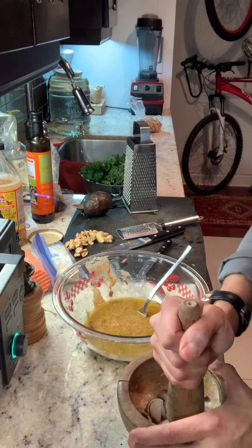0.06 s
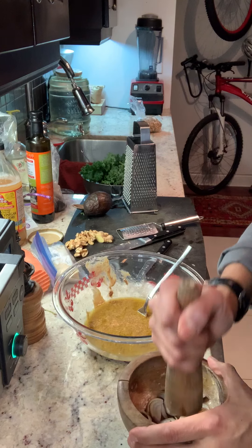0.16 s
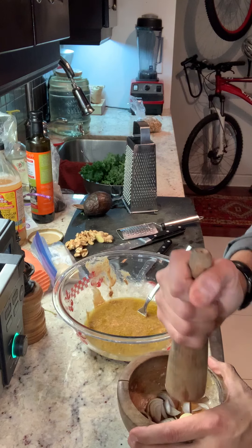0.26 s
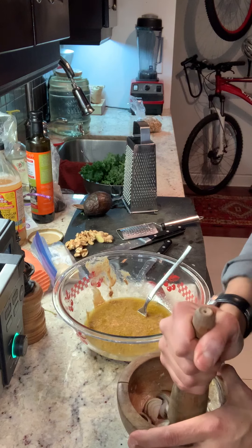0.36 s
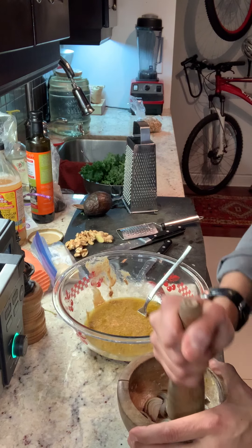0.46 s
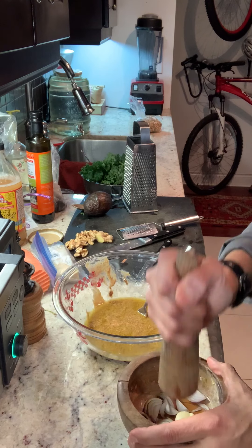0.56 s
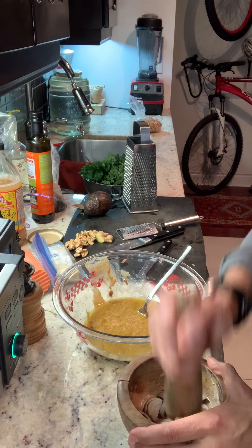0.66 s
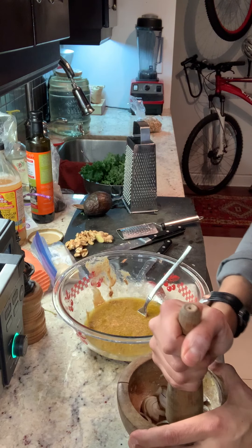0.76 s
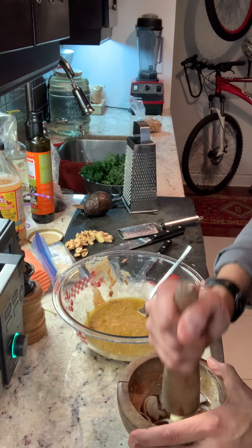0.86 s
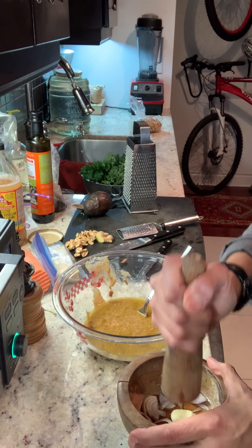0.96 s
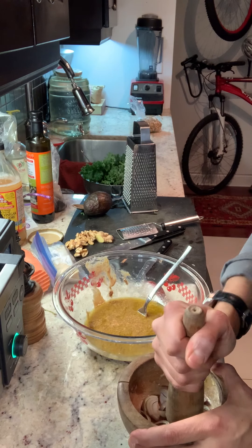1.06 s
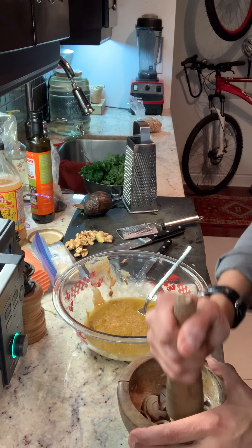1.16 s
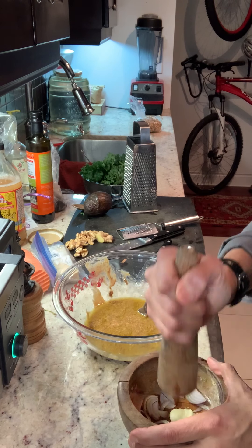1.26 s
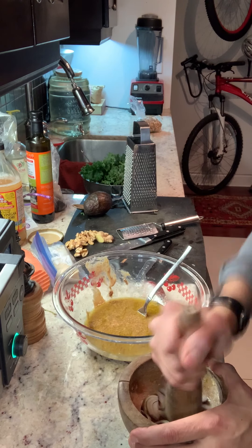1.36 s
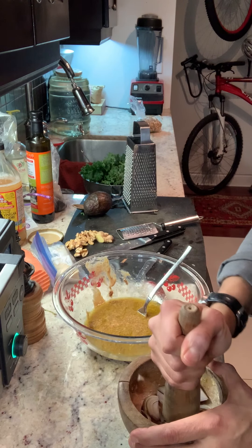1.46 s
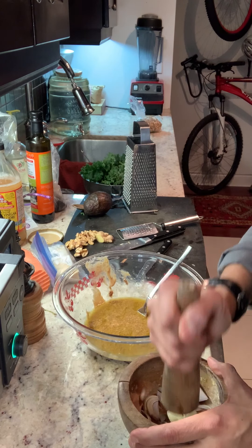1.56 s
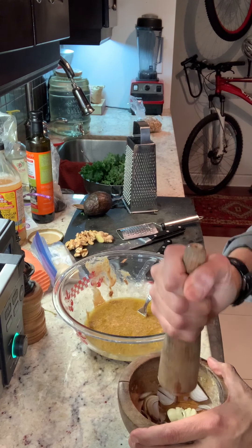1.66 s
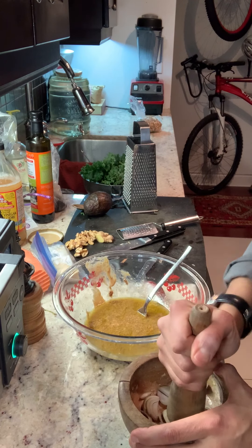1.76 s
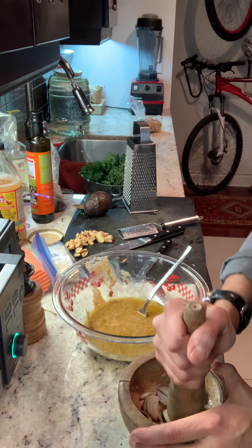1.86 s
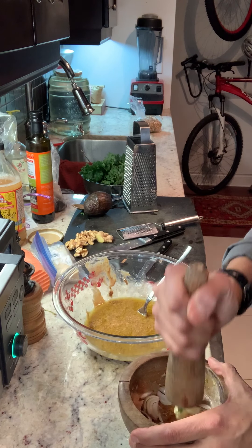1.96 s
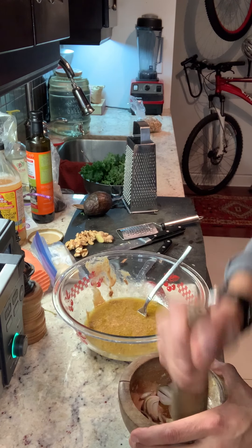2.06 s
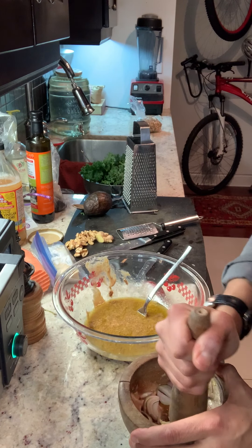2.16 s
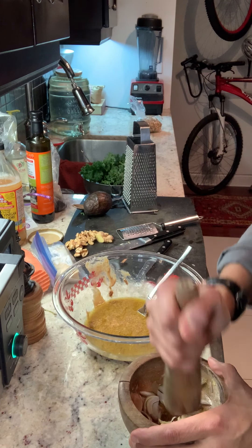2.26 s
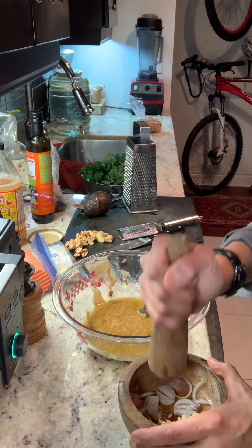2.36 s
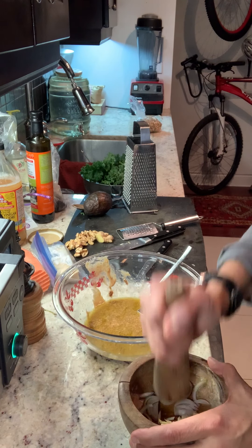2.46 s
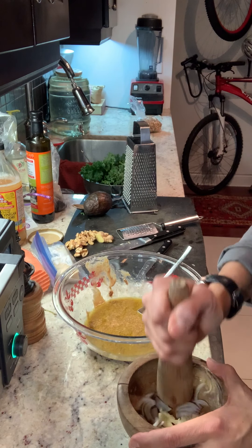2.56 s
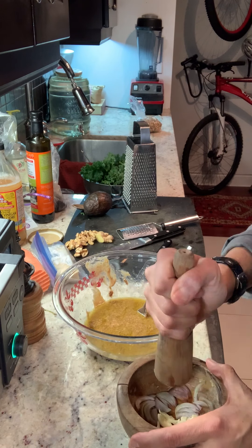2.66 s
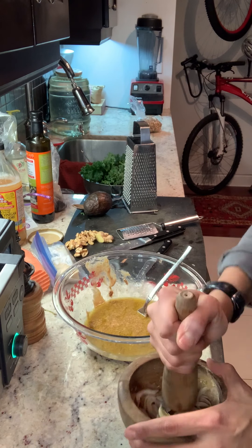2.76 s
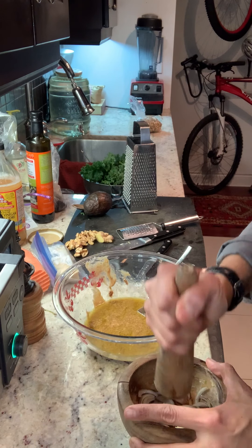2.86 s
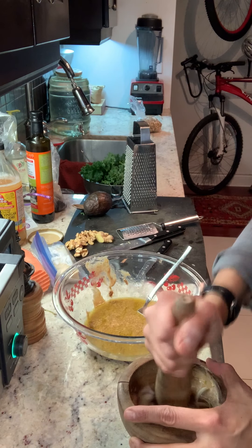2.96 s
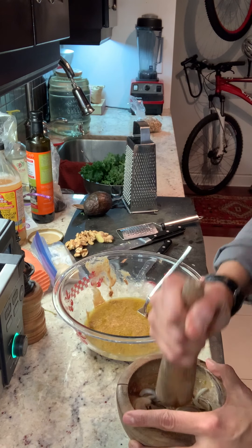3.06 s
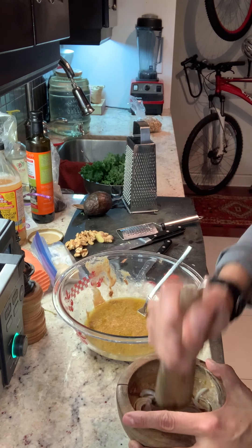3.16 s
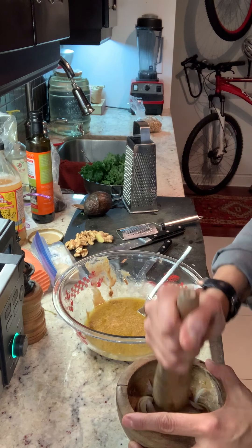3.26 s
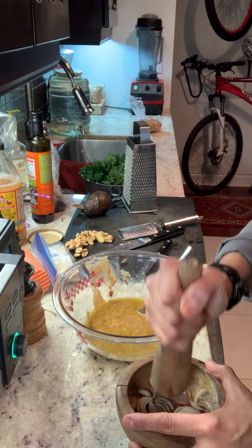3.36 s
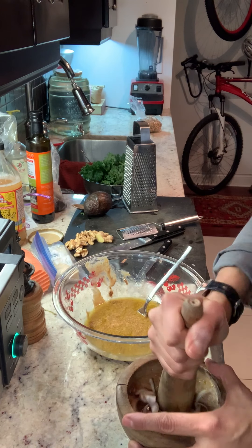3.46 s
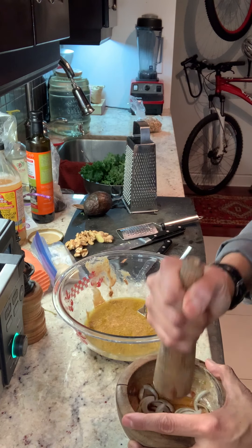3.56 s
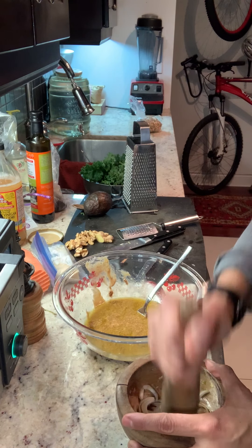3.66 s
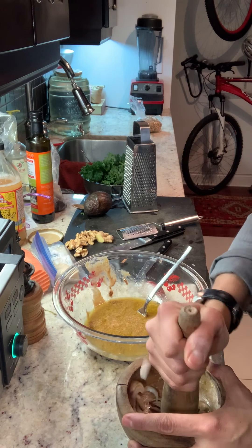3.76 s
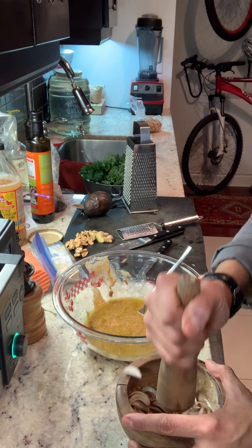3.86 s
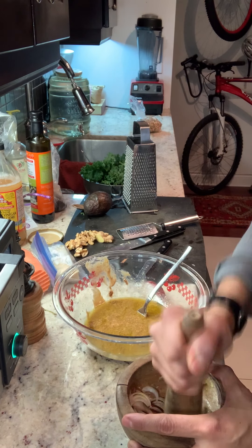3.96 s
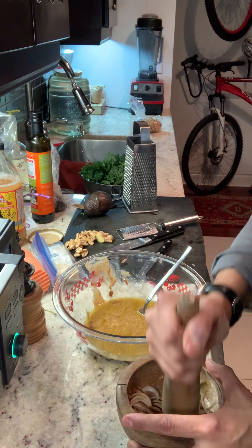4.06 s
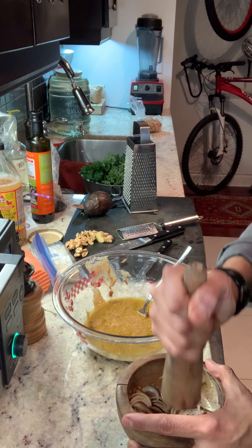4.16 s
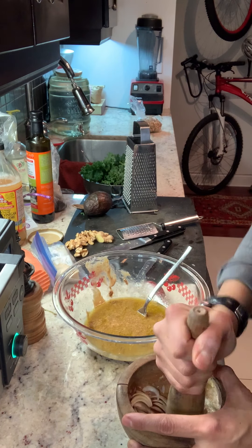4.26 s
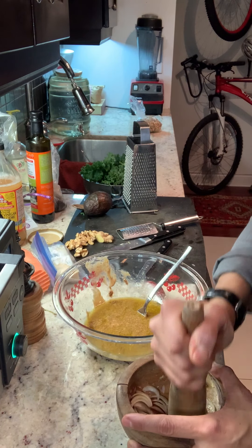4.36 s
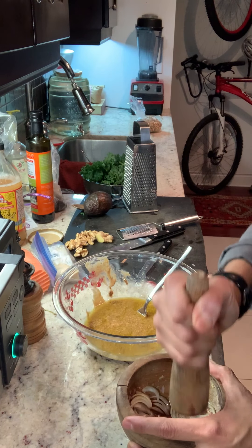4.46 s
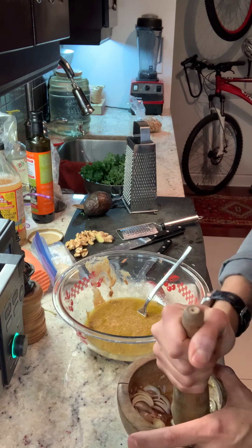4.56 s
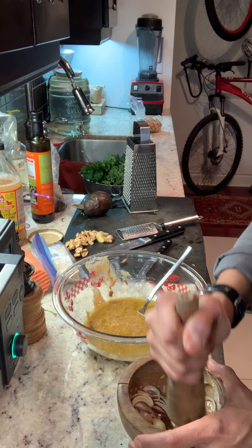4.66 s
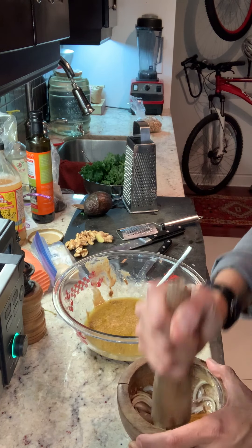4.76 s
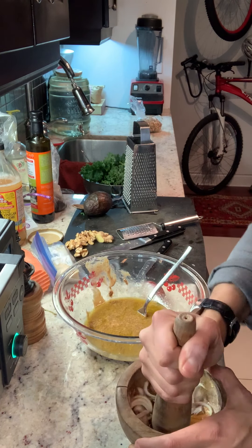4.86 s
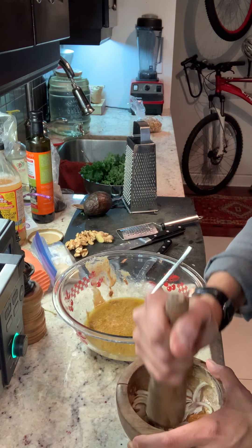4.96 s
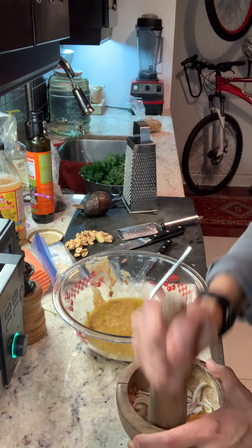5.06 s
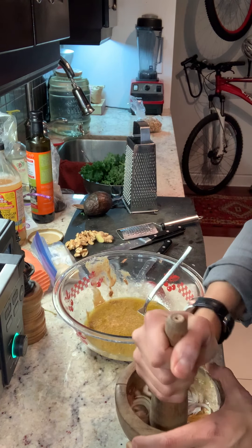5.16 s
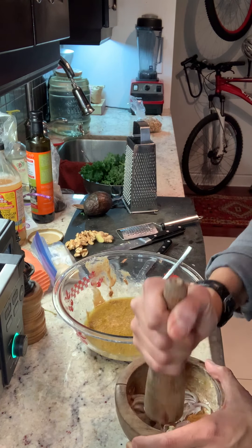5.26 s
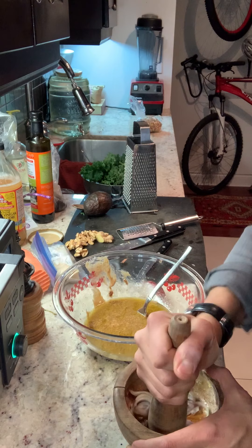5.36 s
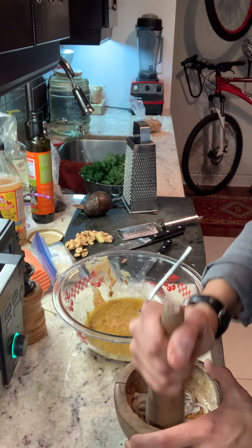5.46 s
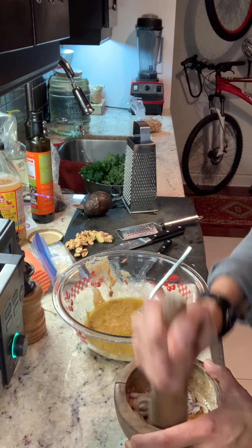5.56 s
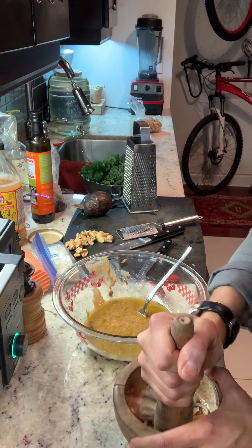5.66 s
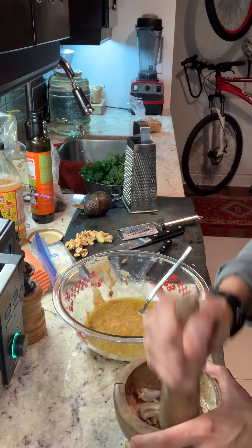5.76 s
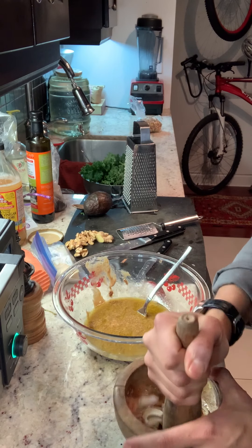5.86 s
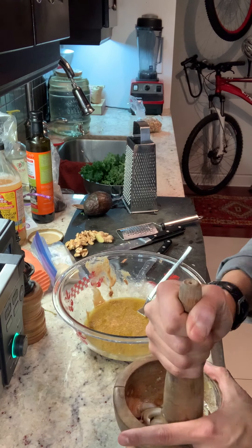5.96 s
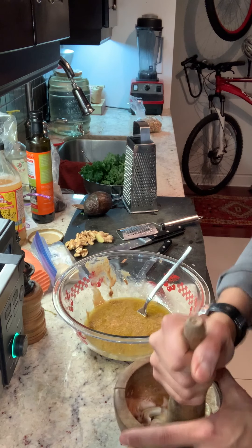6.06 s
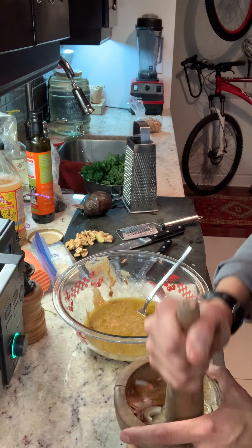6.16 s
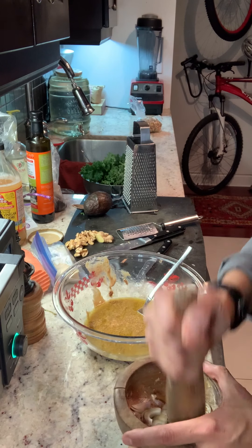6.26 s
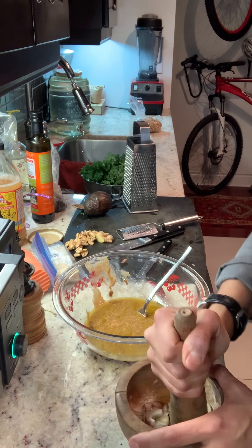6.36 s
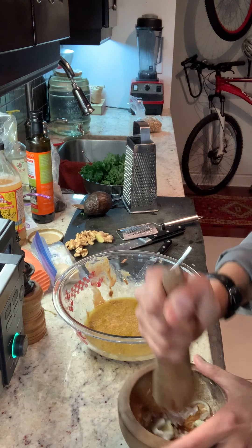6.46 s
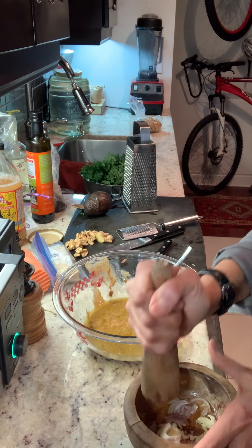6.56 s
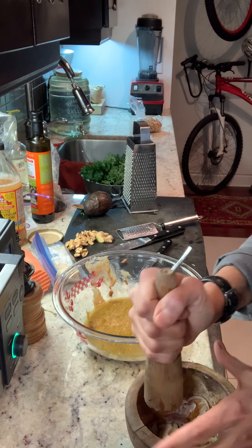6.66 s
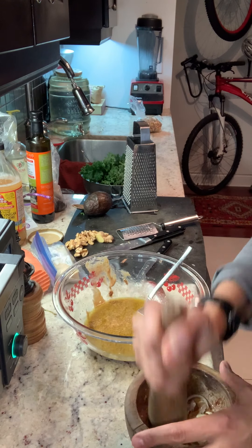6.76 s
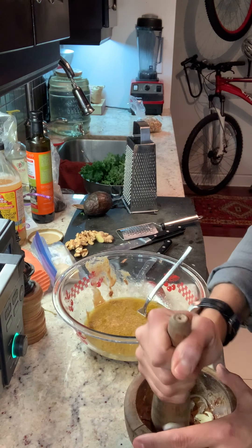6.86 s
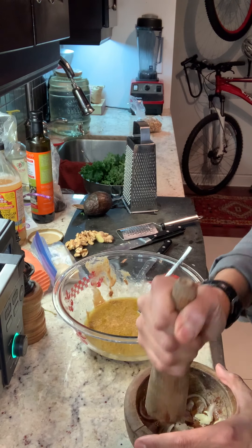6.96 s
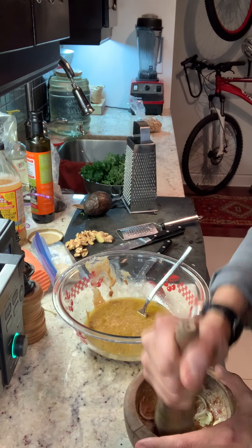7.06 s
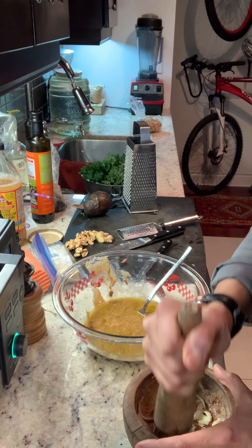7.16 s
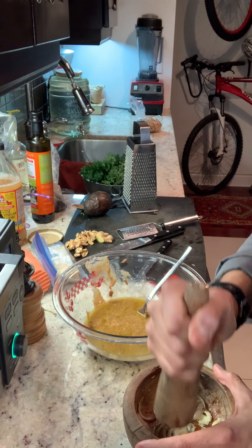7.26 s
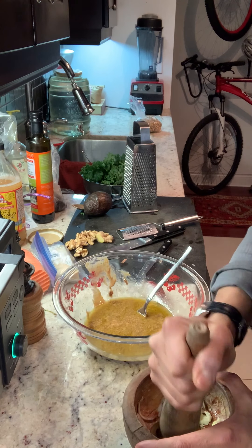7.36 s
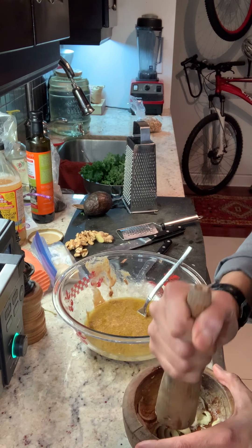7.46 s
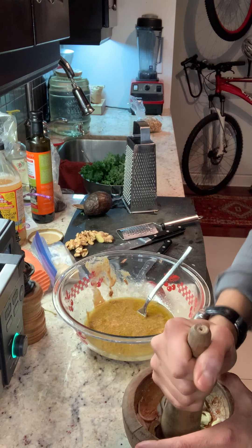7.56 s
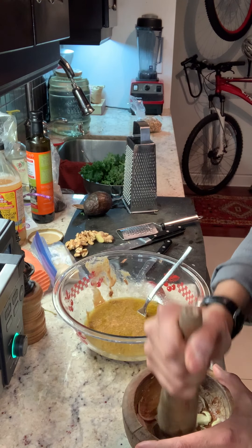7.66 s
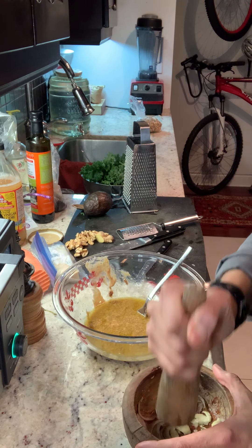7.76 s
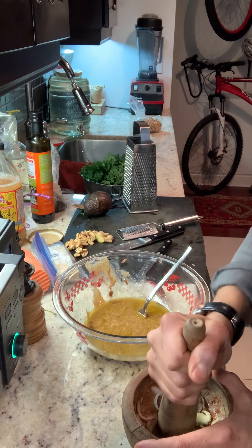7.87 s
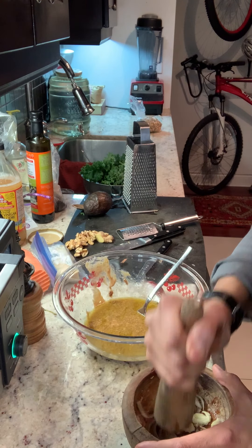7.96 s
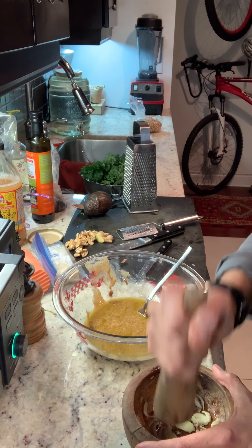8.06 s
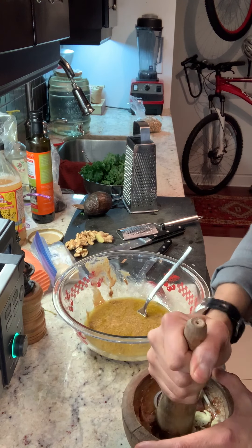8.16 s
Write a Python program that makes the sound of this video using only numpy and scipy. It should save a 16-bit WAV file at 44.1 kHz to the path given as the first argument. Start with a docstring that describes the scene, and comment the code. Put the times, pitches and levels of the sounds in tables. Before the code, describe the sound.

A wooden pestle pounds garlic and shallot in a wooden mortar, steady woody knocks with juicy crunches and low counter thumps in a quiet kitchen.

```python
"""A quiet kitchen hush, then at once a woody blow: garlic and shallot pounded in a hand-held wooden mortar.
In each blow noisy bursts of juicy flesh and the pestle's short tock come first, then the knock on wood,
made of decaying modes and rough grain: dull on a thick layer, hard on a thin one. The counter thumps under
the mortar, low standing waves boom and dishes nearby ring faintly. A microphone pair hears the direct
sound and the dense echoes of the kitchen, the right port louder."""
import sys
import numpy as np
from scipy import signal
from scipy.fft import rfft, irfft, next_fast_len
from scipy.io import wavfile

SR = 44100
rng = np.random.default_rng(int(sys.argv[2]) if len(sys.argv) > 2 else 0)


def master(y):
    """Save y as 16-bit WAV."""
    cut = np.clip(np.atleast_2d(y).T, -1, 1)
    pcm = np.round(cut * 32767)  # scale
    wavfile.write(sys.argv[1], SR, pcm.astype(np.int16))


N = 362502

# Blows of the pestle, levels before the trims in blow() and pounding():
# start_s (tip lands), contact, push_db (on the counter), knock_db (on the wood), crunch_db,
# squeeze_s (before the wood is met)
BLOWS = [(0.03, "woody", -20.5, -32.5, -36.5, .0033), (0.3772, "woody", -20.5, -32.5, -34, 0.00232),
         (0.7264, "woody", -18, -30.5, -32, 0.0049), (1.0655, "firm", -17, -26.5, -30.5, 0.002),
         (1.4122, "firm", -17, -23.5, -26, 0.003), (1.7782, "woody", -16.5, -27.5, -27.5, .0037),
         (2.1206, "woody", -20.5, -39, -31.5, 0.001095), (2.528, "ringing", -23, -21.5, -36, .009),
         (2.7895, "hard", -37, -19.5, -37, 0.002), (3.0148, "padded", -22, -36, -34, 0.0029),
         (3.2352, "firm", -21, -30, -31, .0029), (3.4633, "ringing", -21, -17.5, -31.5, .0065),
         (3.729, "padded", -24, -47.5, -32, 0.00058), (4.0176, "padded", -21.5, -40, -35, .0019),
         (4.299, "firm", -17.5, -24, -28.5, .0034), (4.564, "hollow", -18.5, -25, -27, .0024),
         (4.8523, "hard", -23, -21, -38, .0051), (5.1351, "hard", -21.5, -20.5, -35.5, .0054),
         (5.389, "hard", -21.5, -22, -35, .0061), (5.6382, "hard", -23.5, -19.5, -36, .0042),
         (5.8744, "hard", -25, -21.5, -37, 0.0062), (6.1097, "firm", -24, -26, -34, .0082),
         (6.3456, "hollow", -19.5, -23, -32.5, 0.0026), (6.6217, "glancing", -35, -27.5, -57.5, 0.0016),
         (6.8318, "glancing", -28.5, -46.5, -34.5, 0.00287), (7.1226, "glancing", -30.5, -45, -38, 0.00397),
         (7.3755, "firm", -24, -44, -38, 0.00105), (7.6328, "padded", -20, -32.5, -35.5, .0025),
         (7.8928, "padded", -21.5, -36, -34.5, .0024), (8.1502, "firm", -19.5, -26, -35.5, .0035)]
# Bits of flesh that snap or fall back: start_s, level_db (before the trim in pounding())
BITS = [(2.609, -38), (2.793, -29), (3.541, -29), (3.5527, -38), (6.2866, -52), (6.839, -24.5),
        (7.034, -46.5)]
# Ways the pestle meets the wood: spot_hz, spot_db (weight of that tone), body_db (hollow low wood),
# high_db and clack_db (against the knock), tock_db (pestle against the crunch, before its trim)
CONTACTS = {"padded": (961, 13.5, 0, -15.5, -12, -19.5), "firm": (990.5, -6.5, .5, -9, -12, -7),
            "woody": (1832, -1.5, -.5, -5, -9, 1.5), "ringing": (1198.5, 8, -7, -10.5, -20.5, -4),
            "hard": (1013, 3.5, -2.5, -5, -7.5, 1), "hollow": (508.5, 9, 3.5, -9.5, -14.5, -4.5),
            "glancing": (2067, 16, -1, -4.5, -17.5, -4)}

# Bursting flesh, spectrum shape: frequency_hz, density_db (per Hz)
FLESH_SPECTRUM = [(1000, -14), (1850, -2), (2600, -8), (3700, 4), (4800, 2), (6200, 0), (9000, -1.5),
                  (12000, -4), (16000, -8)]
# The pestle's own short ring: pitch_hz, level_db (relative), t60_s
PESTLE_MODES = [(1856, -2, .024), (2028, -5, .018), (3740, -2, 0.018)]
# Counter and cabinet under the mortar: pitch_hz, level_db (relative), swell_s (time to peak)
COUNTER_MODES = [(87.2, -5, 0.018), (136.8, 0, 0.017), (191, -7, 0.024), (241.6, -10.5, 0.018)]
# Low standing waves of the kitchen, before the trims in thump(): pitch_hz, level_db, t60_s
ROOM_BOOMS = [(50.2, -1.5, 0.72), (64.2, -18.5, 2.8), (90, -18, 1.2), (94.8, -9.5, 0.91), (112, -8, 0.83),
              (123.3, -15.5, 0.8), (134.77, -9, 1.1), (141.5, -7, 0.72), (162.8, -11, 0.91),
              (192.2, -15.5, 0.95), (206, -7, 1.18), (217.9, -11.5, 0.76), (229.5, -28, 0.59),
              (238.5, -9, 0.69), (247, -17.5, 0.55), (248, -17, 0.47), (263.5, -22.5, 0.48),
              (272.4, -20.5, 1.9), (283, -14, 0.58), (357, -23, 0.3)]
# Mortar with the pestle in it, before random shifts: pitch_hz, level_db (relative), t60_s
MORTAR_MODES = [(282, -3.5, 0.066), (341.6, -1, 0.042), (391.3, -3.5, 0.049), (522, -2, 0.037),
                (546, -7, 0.032), (658, -4, 0.015), (746, -11.5, 0.032), (955, -1.5, 0.019),
                (967, 4.5, 0.025), (1010, -12.5, 0.037), (1140, -3, 0.029), (1243, -12, 0.011),
                (1340, -11.5, 0.04), (1594, 12, 0.0093), (1795, 9, 0.016), (1913, -3, 0.016),
                (2137, -1, 0.0084), (2570, -3, 0.014), (2887, -10.5, 0.012), (2770, -7.5, 0.031),
                (3094, -15, 0.076), (3800, -11, 0.015)]
# Dense, heavily damped vibration of the wood, spectrum shape: frequency_hz, density_db (per Hz)
GRAIN_SPECTRUM = [(200, -1), (600, -10.5), (1100, -4.5), (1700, 4.5), (2400, -10), (3000, -10.5),
                  (4000, -12), (6000, -13.5), (12000, -58.5)]
# Limits of the low, middle, high and clacking wood: edge_hz
REGISTER_EDGES_HZ = [230, 700, 1500, 2400, 9000]
# Low and middle wood answer later than the high wood and the clack: lag_s, one per register
REGISTER_LAGS = (0.00398, .002, 0.00023, .0001)
# Dishes on the counter, before random shifts: pitch_hz, level_db (relative), t60_s
DISH_MODES = [(1005, -7, .3), (1029, -6, .35), (1369, -6, .3), (2794, 0, .4), (2916, -1, .4)]

# Kitchen echoes: frequency_hz, reverberation_db, t60_s, left_right_likeness (0 to 1)
KITCHEN_ECHOES = [(197.6, 4, 0.49, 1), (460, 1, 0.44, 0.78), (1010, -0.5, 0.43, 0.29),
                  (1780, -7, 0.48, 0.14), (3710, -4, 0.34, 0.99), (8120, -6, 0.28, 1), (10600, -11, .27, 1),
                  (14000, -10.5, 0.19, 1)]
# Background hush, spectrum shape: frequency_hz, density_db (per Hz)
HUSH_SPECTRUM = [(30, -13.5), (55, 2.5), (130, 0.5), (200, -2.5), (260, -9.5), (500, -24.5), (1000, -23.5),
                 (2500, -38), (5000, -41), (9300, -47.5), (10500, -37), (11500, -56), (16000, -55.5)]
# Microphone pair: frequency_hz, left_minus_right_db, left_lead_radians
PORT_LEAN = [(60, -.7, 0), (130, -1.2, 0), (300, -2.9, .05), (550, -3.2, .5), (1100, -1.9, .05),
             (2200, -1, 0), (5000, -.1, 0)]

REGISTERS = list(zip(REGISTER_EDGES_HZ, REGISTER_EDGES_HZ[1:]))
REGISTER_FILTERS = [signal.butter(3, edges, "band", fs=SR, output="sos") for edges in REGISTERS]
HUSH_DB = -47                # rms ahead of the microphone pair
LEAD_S = .01                 # room left in each blow before the tip lands
CRUNCH_S = .0036             # volley of bursting cells; its pressure peaks at 0.9 of this
BODY_DB, BODY_FOLLOWS_PUSH = -3.5, 0.47   # the hollow low wood lies between knock (0) and push (1)
PORT_LAG_SAMPLES = 5         # left port behind the right, well up in the treble
CUTOFF_HZ = 16000            # top of the recorded band


def from_db(db):
    """Decibels to gain."""
    return 10 ** (np.asarray(db) / 20)


def at_hz(points, hz, axis=1):
    """Read one column of a table on a log-frequency axis."""
    points = np.array(points)
    return np.interp(np.log(hz + 1), np.log(points[:, 0]), points[:, axis])


def seconds(length):
    """A time axis."""
    return np.arange(int(length * SR)) / SR


def unit_blow(x):
    """Scale a sound to rms 1 over its first 50 ms."""
    return x / np.sqrt(np.mean(x[:SR // 20] ** 2) + 1e-20)


def add(out, start_s, x):
    """Mix a sound in at a given time."""
    i = max(int(start_s * SR), 0)
    out[..., i:i + x.shape[-1]] += x[..., :max(N - i, 0)]


def ring(hz, gain, t60, t):
    """Sum of modes, each a sine falling 60 dB in its t60."""
    decay = np.exp(-np.log(1000) * t / t60[:, None])
    return gain @ (np.sin(2 * np.pi * hz[:, None] * t) * decay)


def colour(x, spectrum):
    """Give a signal a smooth spectrum."""
    size = next_fast_len(x.shape[-1] + SR // 50)
    gain = from_db(at_hz(spectrum, np.fft.rfftfreq(size, 1 / SR)))
    return irfft(rfft(x, size) * gain, size)[..., :x.shape[-1]]


def background_hush():
    """Steady coloured noise, mostly common to both ports with a little of its own in each."""
    common = rng.standard_normal(N)
    hush = colour(common + 0.32 * rng.standard_normal((2, N)), HUSH_SPECTRUM)
    return from_db(HUSH_DB) * hush / hush.std()


def crunch(length, cells_per_s=12000, spread_db=3, squeeze_db=-19, squeeze_s=0.02, swell=3.2):
    """Cells burst in a dense volley as the pestle goes in; a few more follow as it presses on."""
    t = seconds(.08)
    struck = rng.random(len(t)) < cells_per_s / SR
    sizes = rng.standard_normal(len(t)) * from_db(spread_db * rng.standard_normal(len(t)))
    age = t / (0.9 * length)
    volley = (age * np.exp(1 - age)) ** swell
    pressing_on = from_db(squeeze_db) * np.exp(-t / squeeze_s) * np.minimum(age, 1)
    return unit_blow(colour(struck * sizes * (volley + pressing_on), FLESH_SPECTRUM))


def pestle(spread_db=1.0):
    """The pestle gives a short tock as soon as its tip lands, its modes weighted anew each time."""
    hz, db, t60 = np.transpose(PESTLE_MODES)
    gains = from_db(db + spread_db * rng.standard_normal(len(hz)))
    return unit_blow(ring(hz, gains, t60, seconds(.05)))


def thump(boom_db=-1, boom_rise_s=0.014, boom_length=0.72, swell_order=3.4):
    """The counter swells and dies within a few cycles and leaves the room's standing waves humming."""
    t = seconds(1.0)
    slab = 0
    for hz, db, swell_s in COUNTER_MODES:
        swell = (t / swell_s * np.exp(1 - t / swell_s)) ** swell_order
        slab = slab + from_db(db) * np.sin(2 * np.pi * hz * t) * swell
    hz, db, t60 = np.transpose(ROOM_BOOMS)
    gains = from_db(db + boom_db) * (-1) ** np.arange(len(hz))   # alternating polarity
    booms = ring(hz, gains, t60 * boom_length, t)
    return unit_blow(slab) + booms * (1 - np.exp(-t / boom_rise_s)) ** 2


def registers(push_db, knock_db, body_db, high_db, clack_db):
    """Levels of the low, middle, high and clacking wood: all follow the knock, the low wood also the push."""
    low_db = BODY_DB + body_db + knock_db + BODY_FOLLOWS_PUSH * (push_db - knock_db)
    return np.array([low_db, knock_db, knock_db + high_db, knock_db + clack_db])


def knock(levels_db, spot_hz, spot_db, lead_s, spread_db=2, detune=0.021, spot_t60=0.035,
          seat_s=.004, seat=0.44, contact_s=0.0019, grain=1.0, grain_s=0.0039, build_s=0.0034):
    """The pestle meets the wall, then seats on the bottom; each touch weights the wood's modes anew."""
    t = seconds(.1) - lead_s
    hz, db, t60 = np.transpose(MORTAR_MODES + [(spot_hz, spot_db, spot_t60)])
    hz = hz * (1 + detune * rng.standard_normal(len(hz)))
    gains = from_db(db + spread_db * rng.standard_normal((2, len(hz))))
    gains = gains * rng.choice([-1, 1], (2, len(hz)))
    met = np.maximum(t, 0)
    seated = np.maximum(t - seat_s * rng.uniform(0.581, 1.429), 0)
    # pulp cushions the contact, so each touch builds up
    first, second = 1 - np.exp(-met / contact_s), 1 - np.exp(-seated / contact_s)
    # the grain builds up while the pestle squeezes down, then dies away
    force = 1 / (np.exp((contact_s - t) / build_s) + np.exp((t - contact_s) / grain_s))
    dense = colour(rng.standard_normal(len(t)) * force, GRAIN_SPECTRUM)
    out = 0
    for (low, high), band, level_db, lag_s in zip(REGISTERS, REGISTER_FILTERS, levels_db, REGISTER_LAGS):
        m = (hz >= low) & (hz < high)
        wall = first * ring(hz[m], gains[0, m], t60[m], met)
        bottom = seat * second * ring(hz[m], gains[1, m], t60[m], seated)
        rough = signal.sosfilt(band, dense)
        register = unit_blow(unit_blow(wall + bottom) + grain * unit_blow(rough))
        out = out + np.interp(t - lag_s, t, from_db(level_db) * register, left=0)
    return out


def dishes(spread_db=3, damping_spread=0.13):
    """Glass and metal nearby ring as decaying modes, picking up the knock."""
    hz, db, t60 = np.transpose(DISH_MODES)
    t60 = t60 * np.exp(damping_spread * rng.standard_normal(len(hz)))
    gains = from_db(db + spread_db * rng.standard_normal(len(hz)))
    return ring(hz, gains, t60, seconds(.5))


def blow(contact, push_db, knock_db, flesh_db, squeeze_s, count,
         wood_db=(-.5, -.3, -.5, -.5), crunch_db=0.49, pestle_db=-6.0, dishes_db=-19):
    """One blow sent in several directions: tip and flesh near LEAD_S, the wood after the squeeze."""
    spot_hz, spot_db, *colour_db, tock_db = CONTACTS[contact]
    levels_db = registers(push_db, knock_db, *colour_db)
    ways = np.zeros((count, len(seconds(.55))))
    add(ways, LEAD_S, from_db(flesh_db + tock_db + pestle_db) * pestle())
    # the dishes follow the clack
    add(ways, LEAD_S + squeeze_s, from_db(levels_db[-1] + dishes_db) * dishes())
    for way in ways:
        add(way, LEAD_S - CRUNCH_S / 10, from_db(flesh_db + crunch_db) * crunch(CRUNCH_S))
        add(way, squeeze_s, knock(levels_db + wood_db, spot_hz, spot_db, LEAD_S))
    return ways


def kitchen(count, first_echo_s=0.0042, early=1.0, early_s=0.022):
    """Stereo room responses: dense echoes, strongest from near surfaces, each band with its own decay."""
    t = seconds(.45)
    edges = np.geomspace(150, 18000, 15)
    white, response = rng.standard_normal((2, 2, count, 1, len(t))), 0
    onset = np.clip(t / first_echo_s - 1, 0, 1) * (1 + early * np.exp(-t / early_s))
    for k, (low, high) in enumerate(zip(edges, edges[1:])):
        hz = np.sqrt(low * high)
        band_filter = signal.butter(2, [low, high], "band", fs=SR, output="sos")
        mid, side = signal.sosfilt(band_filter, white[k % 2])   # neighbouring bands use separate noise
        alike = np.clip(at_hz(KITCHEN_ECHOES, hz, axis=3), 0, 1)
        band = np.sqrt(1 + alike) * mid + np.sqrt(1 - alike) * side * [[1], [-1]]
        fade = onset * np.exp(-np.log(1000) * t / at_hz(KITCHEN_ECHOES, hz, axis=2))
        level = from_db(at_hz(KITCHEN_ECHOES, hz)) / np.sqrt(2 * np.sum(fade ** 2))
        response = response + band * fade * level
    return response


def radiate(ways, rooms):
    """A source sends a different mix each way: the first reaches the pair directly, all come off the walls."""
    echoes = sum(signal.fftconvolve(way[None], room, axes=1) for way, room in zip(ways, rooms))
    out = echoes / np.sqrt(len(ways))
    add(out, 0, ways[0])
    return out


def pounding(thump_db=0, bits_db=-17, push_s=0.00022):
    """All blows; hands and pestle keep shifting, so successive blows reach the room by different paths."""
    out, push, rooms = np.zeros((2, N)), thump(), kitchen(count=11)
    for k, (start_s, contact, push_db, knock_db, flesh_db, squeeze_s) in enumerate(BLOWS):
        paths = rooms.take([2 * k, 2 * k + 1], axis=0, mode="wrap")
        ways = blow(contact, push_db, knock_db, flesh_db, squeeze_s, count=len(paths))
        add(out, start_s - LEAD_S, radiate(ways, paths))
        add(out, start_s + push_s, from_db(push_db + thump_db) * push)
    for start_s, level_db in BITS:
        snap = from_db(level_db + bits_db) * crunch(CRUNCH_S)
        add(out, start_s, radiate([snap], rooms))
    return out


def scene():
    """The pounding over a quiet background."""
    return background_hush() + pounding()


def record(dry, lag_from_hz=1600, ceiling=0.8, low_cut_hz=36):
    """The right port is louder and gets the treble first; peaks are rounded, bottom and top are cut."""
    size = next_fast_len(N + SR // 10)
    hz = np.fft.rfftfreq(size, 1 / SR)
    ports = rfft(dry, size) * from_db(at_hz(PORT_LEAN, hz) * [[.5], [-.5]])
    lag_s = PORT_LAG_SAMPLES / SR * (1 - np.exp(-(hz / lag_from_hz) ** 4))
    turn = at_hz(PORT_LEAN, hz, axis=2) - 2 * np.pi * hz * lag_s
    both = irfft(ports * np.exp(1j * turn * [[1], [0]]), size)[:, :N]   # only the left port is turned
    both = signal.sosfilt(signal.butter(4, low_cut_hz, "high", fs=SR, output="sos"), both)
    rounded = both / (1 + (both / ceiling) ** 4) ** (1 / 4)
    return signal.sosfilt(signal.ellip(10, .2, 80, CUTOFF_HZ, fs=SR, output="sos"), rounded)


dry = scene()
out = record(dry)
master(out)
```